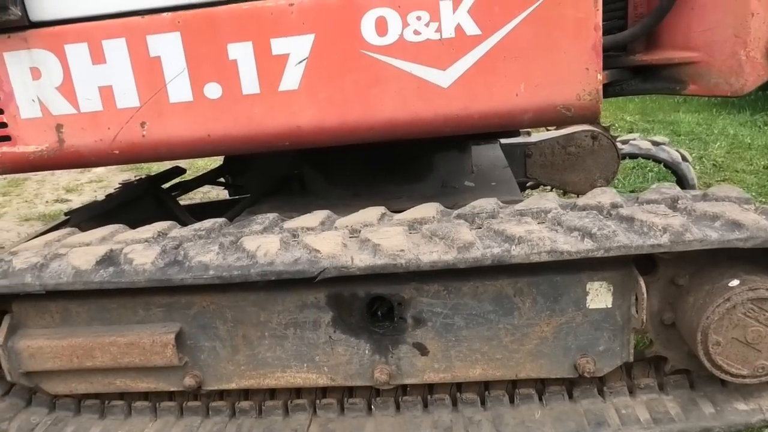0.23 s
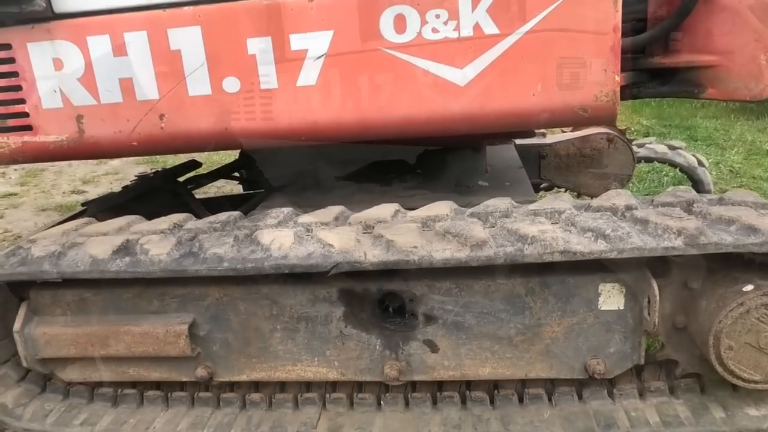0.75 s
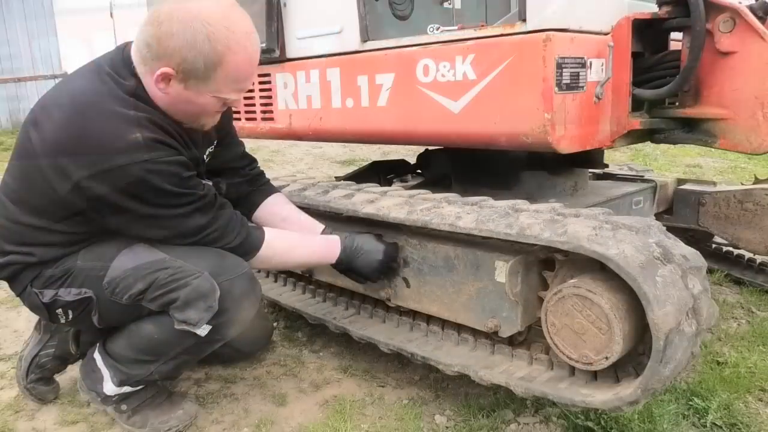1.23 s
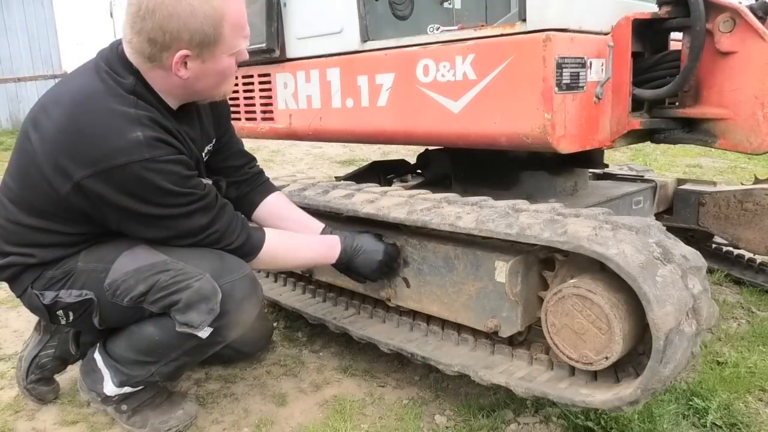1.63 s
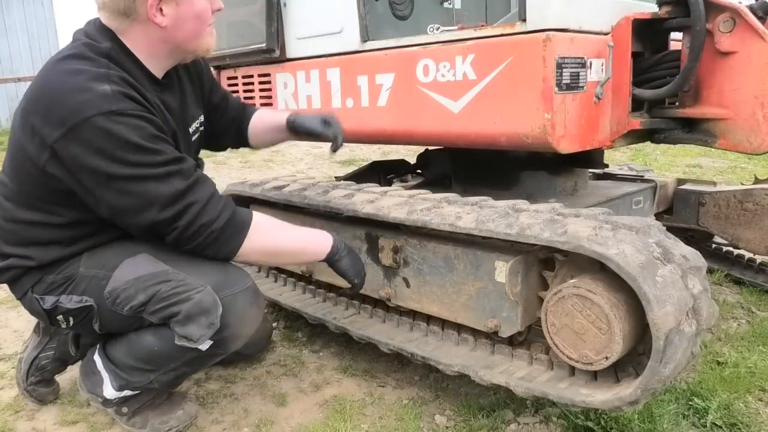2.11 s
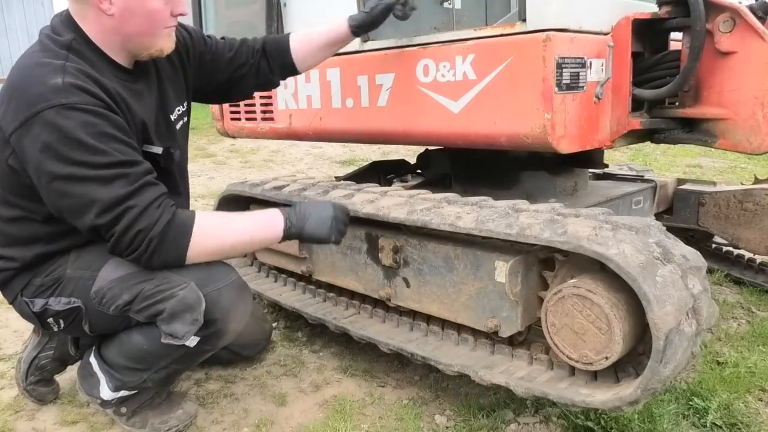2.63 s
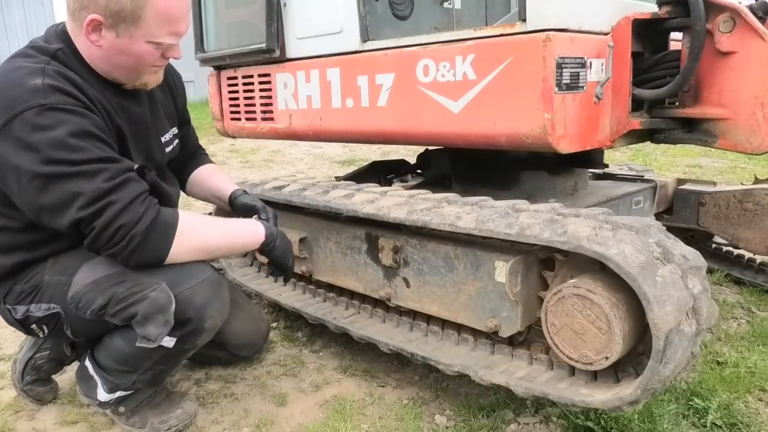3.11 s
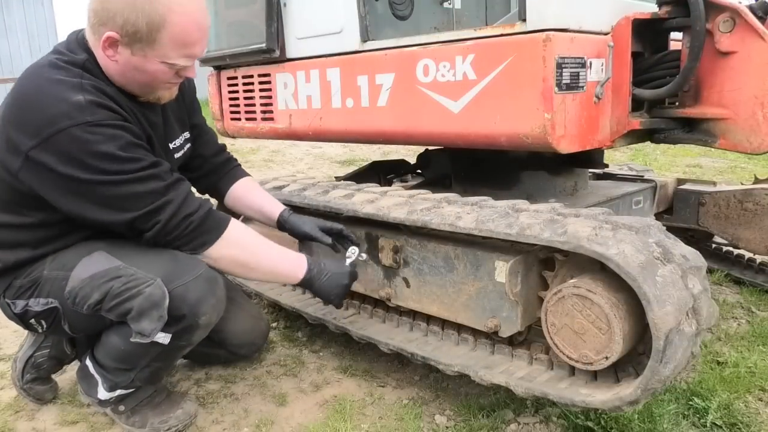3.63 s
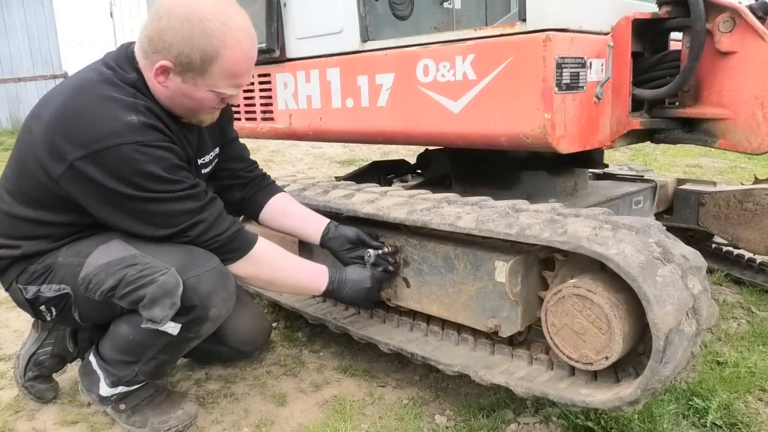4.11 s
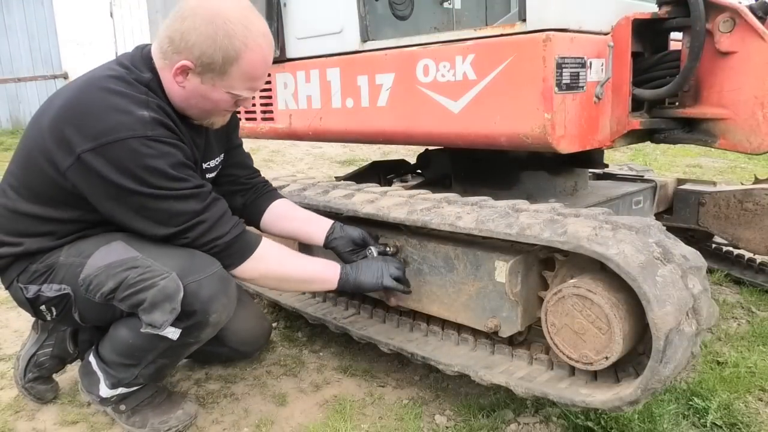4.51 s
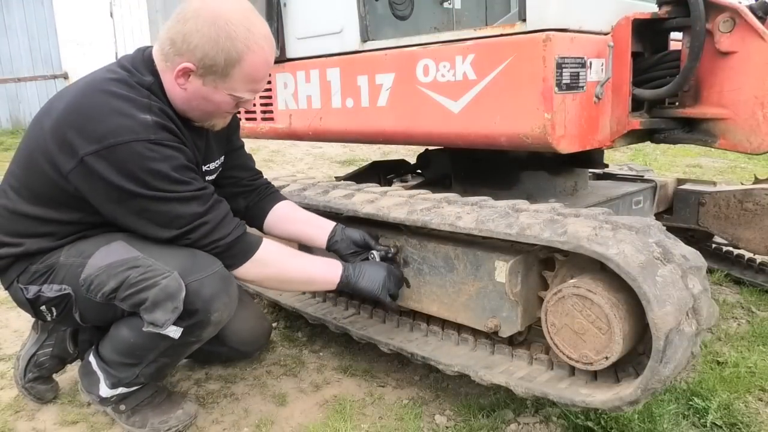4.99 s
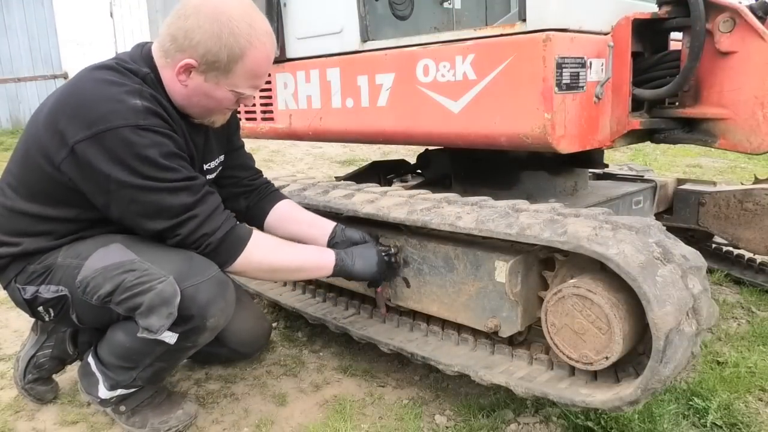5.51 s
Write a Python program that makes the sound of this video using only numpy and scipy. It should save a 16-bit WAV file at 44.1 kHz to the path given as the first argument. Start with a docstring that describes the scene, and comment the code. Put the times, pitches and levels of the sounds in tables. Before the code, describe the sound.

The steady clatter and exhaust thump of an idling diesel digger comes first and loudest, soon fading to faint outdoor air. Quiet handwork follows close by: glove rubs, rustling fabric, gritty ticks and a tool set down on a metal panel, with a faint bird just after. A short scrape leads to one steel clink, then a quick cluster of sharper ones as a small part is fitted.

```python
"""A three-cylinder diesel mini excavator idles outdoors, each firing a knock, ticks and an exhaust thump,
then fades away. In the quiet a gloved mechanic wipes the track frame; his sleeves rustle and a boot
shifts. He lays a tool on the bodywork, which rings, and a bird twitters faintly in gliding whistles.
After a scrape along the track, over a faint far-off whir, he fits a small steel part into the frame
with a few bright clinks that ring both part and frame."""
import sys
import numpy as np
from scipy import signal
from scipy.fft import rfft, irfft
from scipy.io import wavfile
from scipy.ndimage import uniform_filter1d

SR = 44100
rng = np.random.default_rng(int(sys.argv[2]) if len(sys.argv) > 2 else 0)


def unload_wav(signal):
    """Save mono or channel-first audio to the path in sys.argv[1] as 16-bit WAV at rate SR, clipped to [-1, 1]."""
    wavfile.write(
        sys.argv[1],
        SR,
        np.round(np.clip(np.atleast_2d(signal).T, -1, 1) * 32767).astype(np.int16),
    )


N = 253575
TIME = np.arange(N) / SR
HZ = np.maximum(np.fft.rfftfreq(N, 1 / SR), 1)
CYCLE_HZ = 12.33  # four-stroke cycles a second, three firings in each

# exhaust and panel tones of the engine: cycle_multiple, level_db
ENGINE_TONES = [(3, -45), (5, -50), (6, -38.5), (8, -41.5), (9, -38), (10, -39.5), (12, -38), (17, -39),
                (21, -37.5), (23, -38.5), (24, -39.5), (25, -41), (26, -32.5), (29, -36.5), (30, -36),
                (39, -37), (42, -43.5), (52, -44), (57, -44.5), (60, -42.5), (61, -43.5), (63, -40),
                (74, -46), (75, -47.5), (78, -45), (79, -37), (94, -47.5), (97, -45), (107, -45.5)]


def from_db(db):
    """Decibels to gain."""
    return 10 ** (np.asarray(db) / 20)


def rms_one(x):
    """Scale to rms 1."""
    return x / np.sqrt(np.mean(x ** 2) + 1e-20)


def level_curve(rows):
    """A gain envelope through rows of time_s, level_db."""
    return from_db(np.interp(TIME, *np.transpose(rows)))


def over_hz(points):
    """A table read along a log-frequency axis."""
    hz, value = np.transpose(points)
    return np.interp(np.log(HZ), np.log(hz), value)


def colour(x, spectrum):
    """Equalise a signal to a spectrum, rolling off below its first point; rms 1."""
    low_edge = np.minimum(HZ / spectrum[0][0], 1) ** 2
    return rms_one(irfft(rfft(x) * from_db(over_hz(spectrum)) * low_edge, N))


def white():
    """Fresh white noise."""
    return rng.standard_normal(N)


def drift(rate_hz):
    """A random wander through rate_hz points a second; rms 1."""
    points = rng.standard_normal(int(6 * rate_hz) + 2)
    return rms_one(np.interp(TIME * rate_hz, np.arange(len(points)), points))


def clicks(times, levels_db):
    """One impulse for each contact."""
    out = np.zeros(N)
    out[np.round(np.asarray(times) * SR).astype(int)] = from_db(levels_db)
    return out + 1e-18


def decay(impulses, t60):
    """An envelope that jumps at each impulse and dies away."""
    return signal.lfilter([1], [1, -from_db(-60 / (t60 * SR))], impulses)


def struck(times, levels_db, modes):
    """Each contact rings every mode at a slightly different strength; neighbours swing opposite ways."""
    out = np.zeros(N)
    for k, (hz, mode_db, t60) in enumerate(modes):
        radius, angle = from_db(-60 / (t60 * SR)), 2 * np.pi * hz / SR
        blows = clicks(times, levels_db + mode_db + rng.standard_normal(len(times)))
        feedback = [1, -2 * radius * np.cos(angle), radius ** 2]
        out += (-1) ** k * signal.lfilter([.5, 0, -.5], feedback, blows)
    return out


def dense_ring(times, levels_db, low_hz, high_hz, t60):
    """A decaying band of noise: many overlapping modes dying away together."""
    band = signal.butter(3, [low_hz, high_hz], "band", fs=SR, output="sos")
    return rms_one(signal.sosfilt(band, white())) * decay(clicks(times, levels_db), t60)


def swells(rows):
    """The envelope of movements that each speed up and slow down again."""
    return sum(from_db(db) * np.clip(1 - (2 * (TIME - middle_s) / length_s) ** 2, 0, 1) ** 1.6
               for middle_s, length_s, db in rows)


def friction(spectrum, grain_db, grain_hz):
    """Rubbing noise, made grainy by a fast flicker in level; rms 1."""
    return colour(white() * from_db(grain_db * drift(grain_hz)), spectrum)


def outdoors():
    """A steady bed of outdoor air, joined late by a faint far-off whir."""
    # rumble and hiss of the air: freq_hz, density_db
    air_eq = [(10, 16), (25, 4), (50, -9.5), (74, 0.5), (100, -9.5), (145, -4.5), (200, -11.5), (400, -18),
              (1000, -16.5), (2000, -20), (5000, -18), (15000, -19)]
    # rise of the whir: time_s, level_db
    whir_levels = [(3.6, -110), (4.1, -85), (5.0, -87), (5.25, -75), (5.5, -80), (5.75, -84)]
    # its midrange colour: freq_hz, density_db
    whir_eq = [(450, -4), (750, -5), (950, 1), (1200, -5), (2200, -11), (5000, -40)]
    air = from_db(-68) * colour(white(), air_eq)
    return air + level_curve(whir_levels) * colour(white(), whir_eq)


def yard_reverb(x, t60, dull_hz):
    """A short dull scatter from the machine and the sheds."""
    tail = (white() * from_db(-60 * TIME / t60))[:SR // 2]
    tail = signal.lfilter(*signal.butter(2, dull_hz, fs=SR), tail / np.sqrt(np.sum(tail ** 2)))
    return signal.fftconvolve(x, tail)[:N]


def bird(slur_count):
    """Gliding whistles with a quick warble: high chips and lower upward slurs, each above the last."""
    # opening chips: start_s, length_s, start_hz, end_hz, level_db
    chips = [(2.6245, 0.007, 4600, 6050, -61), (2.6305, .007, 4700, 5900, -62),
             (2.656, .014, 5300, 4200, -70), (2.690, .033, 4100, 4620, -71.5),
             (2.775, 0.011, 4750, 5700, -65), (2.791, .008, 5500, 6000, -66),
             (2.804, .014, 5400, 4900, -72)]
    first_s, gap_s, slur_s, rise_hz, slur_db = 2.719, .156, .023, 850, -72.5
    slurs = [(first_s + k * gap_s, slur_s, hz, hz + rise_hz, slur_db)
             for k, hz in enumerate(2500 + 140 * np.arange(slur_count))]
    out = np.zeros(N)
    warble = 1 + .015 * drift(450)
    for start_s, length_s, start_hz, end_hz, db in chips + slurs:
        size, at = int(length_s * SR), int(start_s * SR)
        cycles = np.cumsum(np.linspace(start_hz, end_hz, size) * warble[at:at + size]) / SR
        out[at:at + size] += from_db(db) * np.sqrt(np.hanning(size)) * np.sin(2 * np.pi * cycles)
    flutter = from_db(3.5 * drift(220))
    return out * flutter


def boot():
    """A boot shifts on the dirt in soft gritty swells."""
    # scuffs: middle_s, length_s, peak_db
    scuffs = [(2.18, 0.25, -72), (3.64, 0.25, -73.5)]
    # sole on dirt: freq_hz, density_db
    dirt_eq = [(400, -4), (1000, -1.5), (1800, -7), (3300, 0.5), (4500, -3), (7000, -11), (15000, -24)]
    return swells(scuffs) * friction(dirt_eq, grain_db=2.5, grain_hz=300)


def arm_motion():
    """How strongly the arms move, as a gain, with slight stirring between gestures."""
    # arm movements: middle_s, length_s, peak_db
    gestures = [(1.66, 0.25, -69), (1.83, 0.27, -66.5), (2.045, 0.1, -67.5), (2.26, 0.53, -71),
                (2.38, 0.19, -68.5), (2.57, 0.18, -64.5), (2.79, 0.063, -69), (3.14, 0.36, -65.5),
                (3.236, 0.033, -63.5), (3.43, 0.22, -65), (3.65, 0.26, -65), (3.8, 0.17, -66),
                (4.258, 0.054, -70), (4.303, 0.049, -61), (4.61, 0.46, -68), (4.94, 0.041, -63.5),
                (5.47, 0.1, -66.5), (5.66, 0.2, -69)]
    return np.hypot(swells(gestures), from_db(-75.5))


def sleeves():
    """Fabric rubs with a fine uneven grain as the arms move."""
    # rubbing fabric: freq_hz, density_db
    fabric_eq = [(300, -5), (1000, -6), (2000, -2), (4000, 1), (7000, 2), (11000, 2), (15500, -1)]
    grain_db = 2.5 * drift(500) + 1.2 * drift(60)
    return arm_motion() * colour(white() * from_db(grain_db), fabric_eq)


def glove_wipes():
    """A glove slides over the steel frame in short pulls, duller as it slows."""
    # pulls: middle_s, length_s, rub_db, edge_db
    pulls = np.array([(1.394, 0.078, -57, -54.5), (1.438, 0.085, -58, -68), (1.474, 0.026, -61, -77)])
    # body of the rub: freq_hz, density_db
    rub_eq = [(1250, -14), (1680, -3), (2150, -16), (3000, -11), (4280, 0), (4650, -4), (5200, -0.5),
              (7000, 0.5), (9500, -6), (11000, -6), (12000, -17), (16000, -12)]
    # its bright edge: freq_hz, density_db
    edge_eq = [(6500, -22), (8400, -3), (10400, 2), (11000, -5), (11900, -24), (16000, -32)]
    middle_s, length_s, rub_db, edge_db = pulls.T
    rub = swells(zip(middle_s, length_s, rub_db)) * friction(rub_eq, grain_db=1.3, grain_hz=290)
    edge = swells(zip(middle_s, length_s, edge_db)) * colour(white(), edge_eq)
    return rub + edge


def track_scrape():
    """The glove scrapes along the track and stops short."""
    # the stroke: time_s, level_db
    stroke = [(3.445, -90.5), (3.458, -63.5), (3.49, -63), (3.516, -66), (3.527, -82)]
    # glove on track: freq_hz, density_db
    scrape_eq = [(200, 1.5), (500, 0), (950, -1), (1400, -15.5), (3200, -14.5), (4300, -1), (5450, 1),
                 (6000, -2.5), (8200, 1), (9500, -8), (15500, -10.5)]
    return level_curve(stroke) * friction(scrape_eq, grain_db=2.5, grain_hz=400)


def grit_ticks(per_second):
    """Brief snaps of glove rubber and grit, among fainter random ones as strong as the arms move."""
    # the clearest snaps: start_s, level_db, low_hz, high_hz, t60_s
    snaps = [(2.036, -64, 6000, 8800, 0.13), (2.567, -60, 4500, 9000, .02), (2.576, -53, 2700, 9100, .028),
             (2.5907, -57, 4500, 9000, .02), (2.977, -60, 3000, 11000, .015),
             (2.993, -60.5, 2400, 4000, .035), (2.994, -60, 4500, 11000, .02),
             (3.0324, -55, 3500, 14000, .011), (3.107, -55, 4000, 13000, .035),
             (3.176, -60, 6500, 11000, .015), (3.213, -54, 6500, 8700, .02),
             (3.288, -58, 4000, 10000, .012), (3.361, -60, 5800, 7600, .02), (3.387, -59, 3500, 7000, .02),
             (3.4207, -52, 4000, 14000, .018), (3.4495, -50, 4020, 11000, 0.022),
             (4.349, -61, 3000, 6000, .015), (4.866, -56.5, 6800, 8550, .02)]
    clear = sum(dense_ring([s], [db], low_hz, high_hz, t60) for s, db, low_hz, high_hz, t60 in snaps)
    onsets = rng.random(N) < per_second / SR
    over_rustle_db = 1.5 + 2.2 * white()[onsets]
    faint = dense_ring(TIME[onsets], over_rustle_db, low_hz=3750, high_hz=15000, t60=.015)
    return clear + arm_motion() * faint


def bumps(gap_s):
    """Soft damped knocks, repeating while a thing settles, with a low thud of the heavy body."""
    # dull contacts: start_s, knock_db, thud_db, settling_s
    contacts = [(2.539, -79, -68, .06), (2.604, -69, -78, .01), (3.449, -81, -70.5, .08),
                (4.022, -61, -92, .01), (5.178, -44.5, -70, .01), (5.645, -72, -82, .01)]
    # colour of the knock: freq_hz, density_db
    knock_eq = [(70, -5), (130, -4), (200, -10), (380, -10), (580, 4), (750, -3), (1000, -9), (1300, -9),
                (1700, -1), (2100, -8), (2800, -16), (6000, -40), (15000, -60)]
    hits = [(start_s + wait_s, knock_db, thud_db) for start_s, knock_db, thud_db, settling_s in contacts
            for wait_s in np.arange(0, settling_s, gap_s)]
    times, knock_db, thud_db = np.transpose(hits)
    knocks = colour(white(), knock_eq) * decay(clicks(times, knock_db), t60=.04)
    return knocks + dense_ring(times, thud_db, low_hz=65, high_hz=298, t60=.13)


def tool_on_panel():
    """A tool lands on the bodywork: clear panel modes over a faint buzz of close ones and a thud."""
    # the tool's contacts: start_s, level_db
    contacts = [(2.5237, -51), (2.5278, -64)]
    # modes of the body panel: pitch_hz, level_db, t60_s
    panel_modes = [(405, -10, 0.09), (460, -14, 0.16), (1185, -12, 0.075), (1250, -10, .06),
                   (1836, -13, .1), (2020, -2, 0.035), (2240, -5, 0.04), (2350, -2, .05), (2415, -2, 0.065),
                   (2830, -10, 0.036), (3270, -5, 0.05), (3540, -4, .05), (3618, -9, 0.09),
                   (4328, -18, .11), (4880, -12, 0.06), (5460, -17, .1), (5889, -12, 0.055)]
    times, levels_db = np.transpose(contacts)
    clack = dense_ring(times, levels_db - 5, low_hz=1900, high_hz=3900, t60=.04)
    buzz = dense_ring(times, levels_db - 17, low_hz=1900, high_hz=4400, t60=.2)
    thud = dense_ring(times, levels_db - 17, low_hz=300, high_hz=540, t60=.2)
    return struck(times, levels_db, panel_modes) + clack + buzz + thud


def steel_clinks():
    """Steel on steel: a crack, the part's short ring, pitched by how it is held, and the frame's ring."""
    # the part meets the frame: start_s, clink_db, pitch_hz, snap_db, frame_db
    contacts = [(4.0169, -47, 6070, -41, -42.5), (4.0197, -45, 12400, -35, -46),
                (5.134, -55, 6000, -54, -53), (5.1427, -31, 8750, -22.5, -64),
                (5.1535, -37, 8600, -50, -70), (5.1647, -30.5, 8100, -32, -57),
                (5.1697, -30, 8240, -45, -46.5), (5.219, -40, 8800, -40, -74),
                (5.2211, -34.5, 8800, -32, -54), (5.4273, -45, 7170, -35, -68),
                (5.4302, -36.5, 7130, -42, -61), (5.5815, -47, 7600, -51, -73),
                (5.585, -41.5, 7520, -38, -71), (5.628, -55, 7000, -55, -62),
                (5.729, -57.5, 6440, -62, -71)]
    # bright contact crack: freq_hz, density_db
    crack_eq = [(2500, -23), (4000, -3.5), (6000, 0), (8500, 6), (10000, 4), (12300, 4.5), (15500, 3.5)]
    # modes of the small part: pitch_ratio, level_db, t60_s
    part_modes = [(.8, -13.5, 0.016), (.93, -12, 0.016), (1, 0, 0.016), (1.09, -10, 0.016),
                  (1.22, -13, .01), (1.38, -14, 0.013), (1.62, -18, .012)]
    # modes of the track frame: pitch_hz, level_db, t60_s
    frame_modes = [(590, -18, 0.1), (1580, -9, 0.03), (1715, -6, 0.04), (1880, -10, .03), (2090, -12, 0.11),
                   (2280, -8, .03), (2540, -4, 0.036), (2930, -13, .035), (3290, -14, 0.035),
                   (3800, -10, 0.022), (4400, -14, .02), (5230, -12, .02)]
    times, clink_db, pitch_hz, snap_db, frame_db = np.transpose(contacts)
    snap = decay(clicks(times, snap_db), t60=.0009)
    tail = from_db(-3) * decay(clicks(times, clink_db), t60=.021)
    crack = colour(white(), crack_eq) * (snap + tail)
    ring = sum(struck([s], db, [(ratio * hz, mode_db, t60) for ratio, mode_db, t60 in part_modes])
               for s, db, hz in zip(times, clink_db, pitch_hz))
    part = signal.sosfilt(signal.butter(2, 3000, "high", fs=SR, output="sos"), crack + ring)
    clank = dense_ring(times, frame_db - 14, low_hz=1450, high_hz=2650, t60=.065)
    sizzle = dense_ring(times, frame_db - 22, low_hz=3000, high_hz=9000, t60=.1)
    return part + struck(times, frame_db, frame_modes) + clank + sizzle


def clatter(spectrum, alternate_db):
    """Vibration between the engine tones, partly repeating; alternate_db makes alternate cycles differ."""
    # how much of the clatter repeats: freq_hz, power_share
    repeat_shares = [(150, 0.6), (800, .72), (2000, .85), (3500, 0.3), (7000, 0.9), (13000, 0.5)]
    period = round(2 * SR / CYCLE_HZ)  # two engine cycles
    partials = np.exp(2j * np.pi * rng.random(period // 2 + 1))
    partials[1::2] *= from_db(alternate_db)
    partials[[2 * round(multiple) for multiple, _ in ENGINE_TONES]] = 0  # leave room for the tones
    loop = rms_one(np.resize(irfft(partials, period), N))
    share = np.clip(over_hz(repeat_shares), 0, 1)
    blend = rfft(loop) * np.sqrt(share) + rfft(white()) * np.sqrt(1 - share)
    return colour(irfft(blend, N), spectrum)


def firing_envelope(delay_s, rise_s, t60):
    """A swell and decay for each cylinder's firing, each of its own strength; rms 1."""
    # the three cylinders in firing order: late_s, strength_db
    cylinders = [(0, -1.4), (-.0004, .7), (.0008, .7)]
    times = np.arange(delay_s, TIME[-1] - .01, 1 / (len(cylinders) * CYCLE_HZ))
    late_s, strength_db = np.resize(cylinders, (len(times), 2)).T
    blows = clicks(times + late_s, strength_db + 1.1 * rng.standard_normal(len(times)))
    return rms_one(decay(decay(blows, t60), rise_s))


def firing_bursts(spectrum, delay_s, rise_s, t60, alternate_db):
    """A burst of clatter at each firing, nearly the same from cycle to cycle; rms 1."""
    ring = clatter(spectrum, alternate_db)
    even_ring = ring / np.sqrt(uniform_filter1d(ring ** 2, size=220) + 1e-9)
    return rms_one(even_ring * firing_envelope(delay_s, rise_s, t60))


def crank_tones(cycle_phase, rows):
    """Sines locked to the crank; those of the muffler peak together once a cycle, making the chug."""
    chug_s, muffler_low_hz, muffler_high_hz = .047, 275, 400
    since_chug = cycle_phase - 2 * np.pi * CYCLE_HZ * chug_s
    out = np.zeros(N)
    for multiple, db in rows:
        scatter_rad = 1 if muffler_low_hz < multiple * CYCLE_HZ < muffler_high_hz else np.pi
        gain = from_db(db + 1.2 * drift(13))
        out += gain * np.sin(round(multiple) * since_chug + rng.uniform(-scatter_rad, scatter_rad))
    return out


def diesel_idle():
    """Crank tones, fan and drone; each firing adds injector tick, knock, valve tick and exhaust thump."""
    # metallic tones of the block at each combustion: cycle_multiple, level_db
    block_tones = [(141, -45), (144, -48), (159, -45.5), (161, -48), (171, -45), (234, -50), (251, -47),
                   (274, -51), (286, -48), (313, -51), (320, -52)]
    # steady drone of the housing: freq_hz, density_db
    drone_eq = [(65, -24.5), (110, -1), (200, 0.5), (340, -4.5), (430, -4.5), (540, 0), (650, -12),
                (800, -6), (1100, -12.5), (1600, -18.5), (2000, -19), (4000, -23), (5200, -31), (8000, -35),
                (11000, -46), (15000, -55.5)]
    # exhaust thump: freq_hz, density_db
    thump_eq = [(130, -7.5), (220, -0.5), (330, 2.5), (420, -3), (520, -1), (650, -13), (1200, -34.5),
                (8000, -79)]
    # noisy ring of the block: freq_hz, density_db
    block_eq = [(1300, -14), (1550, -14), (1720, 2), (1900, 0), (2100, -4), (2400, -12), (3200, -19),
                (9000, -22), (15000, -39)]
    # combustion knock: freq_hz, density_db
    knock_eq = [(500, -16), (900, -2.5), (1250, 1), (1420, 6.5), (1530, -6.5), (1800, 1), (2300, -5.5),
                (2500, -1.5), (2750, -5), (2890, 1), (3020, -5.5), (3230, -7), (3480, 5.5), (3680, -2),
                (3860, 1), (4030, -5.5), (4230, -1.5), (4400, -7.5), (5100, -17), (7900, -17.5),
                (10000, -27), (12500, -36.5), (15500, -41.5)]
    # tick of valves and injectors: freq_hz, density_db
    tick_eq = [(1000, -16.5), (2000, 1), (3700, -1), (5000, -5), (5500, -4), (6050, 2), (6800, -5),
               (7600, -7), (8400, -6), (9200, -18), (10500, -20), (11300, -30), (12100, -24), (13000, -36),
               (15000, -44)]
    cycle_phase = 2 * np.pi * CYCLE_HZ * (TIME + .00004 * drift(7.4))
    tones = crank_tones(cycle_phase, ENGINE_TONES)
    tones += crank_tones(cycle_phase, block_tones) * firing_envelope(delay_s=.004, rise_s=.014, t60=.068)
    fan = from_db(-38 + 2.7 * drift(2.7)) * np.sin(2 * np.pi * 153.2 * TIME)
    drone = from_db(-25.5) * clatter(drone_eq, alternate_db=-7)
    thump = firing_bursts(thump_eq, delay_s=.018, rise_s=.022, t60=.039, alternate_db=-6)
    block = firing_bursts(block_eq, delay_s=.0046, rise_s=.009, t60=.024, alternate_db=-8)
    knock = firing_bursts(knock_eq, delay_s=.0045, rise_s=.016, t60=.06, alternate_db=-12.5)
    valves = firing_bursts(tick_eq, delay_s=.017, rise_s=.0033, t60=.03, alternate_db=-9)
    injectors = firing_bursts(tick_eq, delay_s=.0027, rise_s=.0028, t60=.024, alternate_db=-14)
    combustion = from_db(-37.5) * block + from_db(-33) * knock + from_db(-44.5) * injectors
    combustion *= from_db(1.2 * drift(37))  # some firings hit harder
    hum = np.sqrt(2) * (tones + fan) + drone
    return hum + combustion + from_db(-32) * thump + from_db(-44.5) * valves


def scene():
    """The idle fades out in a straight line, leaving handwork and a bird over quiet outdoor air."""
    events = steel_clinks() + bumps(gap_s=.036) + grit_ticks(per_second=14) + tool_on_panel()
    events += bird(slur_count=5)
    ambience = outdoors()
    fade_start_s, fade_end_s = .79, 1.4
    engine = diesel_idle() * np.interp(TIME, [fade_start_s, fade_end_s], [from_db(-.5), 0])
    reverb = from_db(-9.5) * yard_reverb(events, t60=.2, dull_hz=2390)
    rubbing = sleeves() + glove_wipes() + track_scrape() + boot()
    return (ambience + reverb + rubbing + events + engine)[None]


def record(dry):
    """A steep low-pass cuts the extreme treble."""
    return signal.sosfilt(signal.ellip(10, .1, 90, 15900, fs=SR, output="sos"), dry)


dry = scene()
out = record(dry)
unload_wav(out)
```